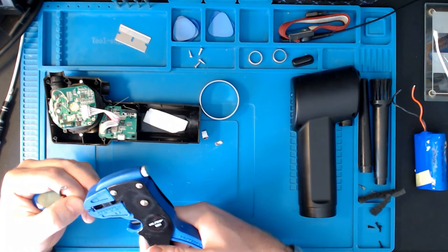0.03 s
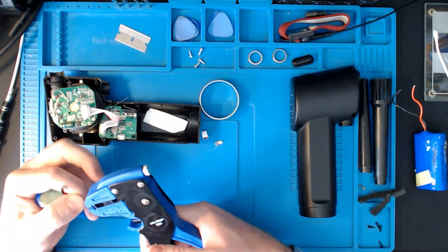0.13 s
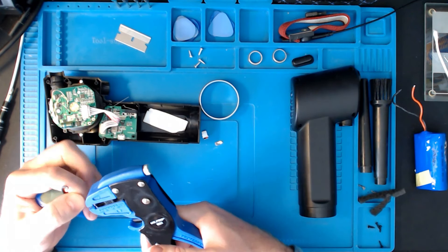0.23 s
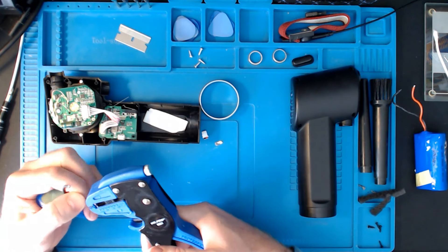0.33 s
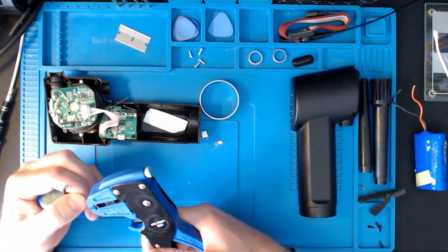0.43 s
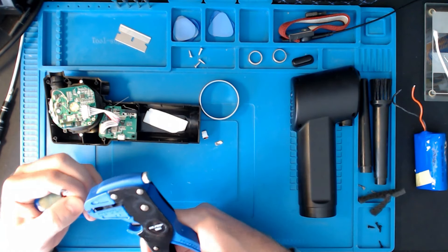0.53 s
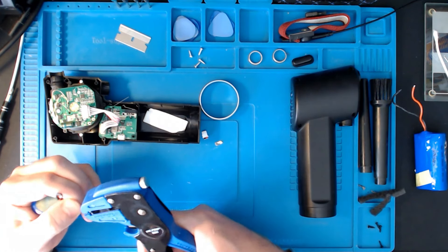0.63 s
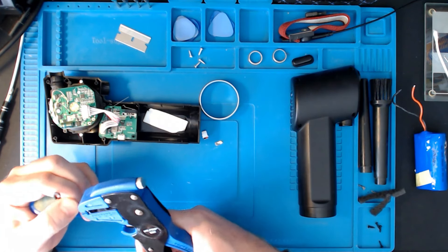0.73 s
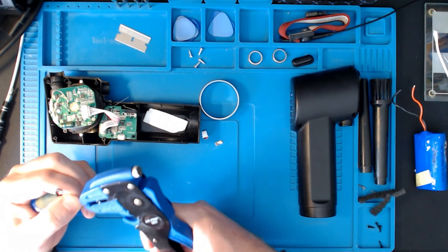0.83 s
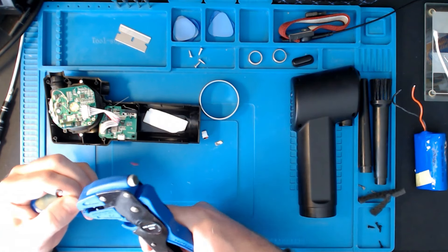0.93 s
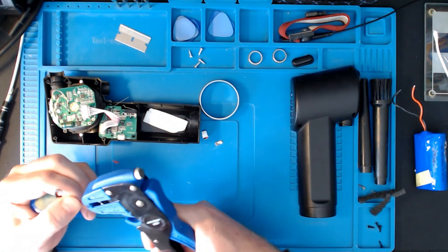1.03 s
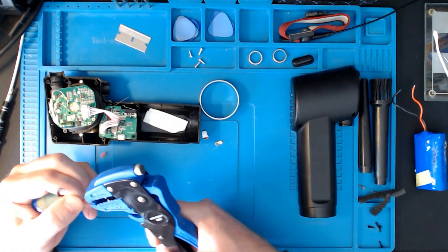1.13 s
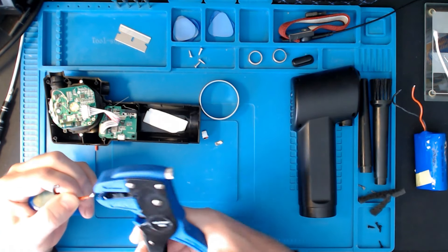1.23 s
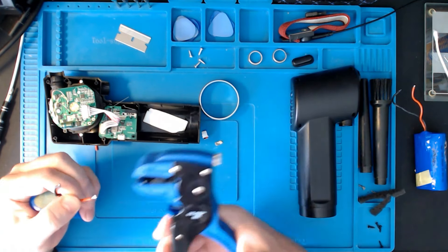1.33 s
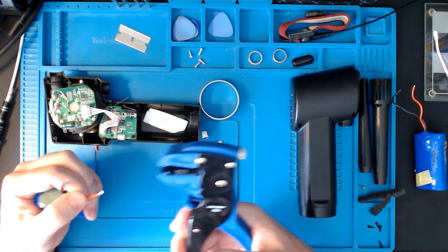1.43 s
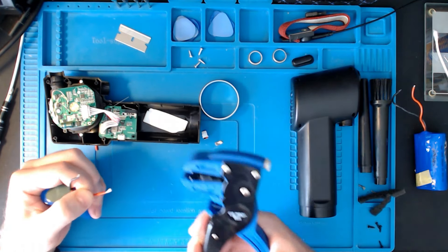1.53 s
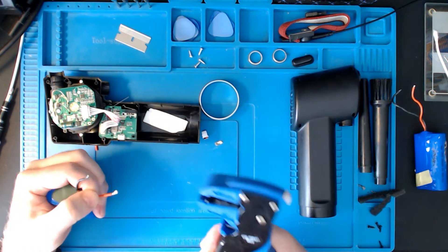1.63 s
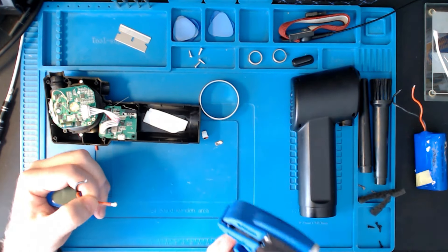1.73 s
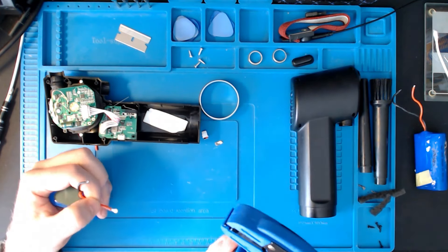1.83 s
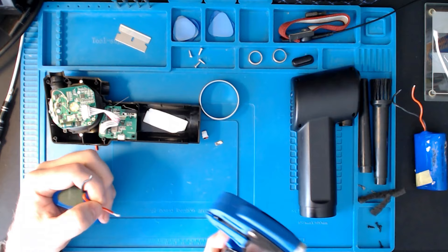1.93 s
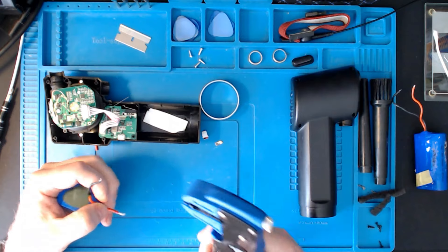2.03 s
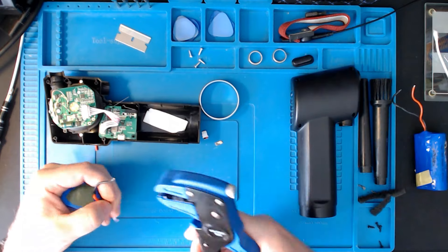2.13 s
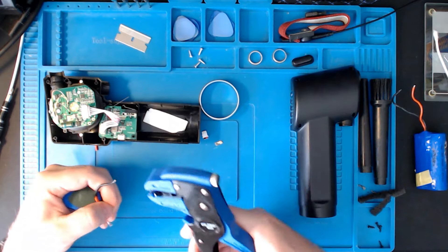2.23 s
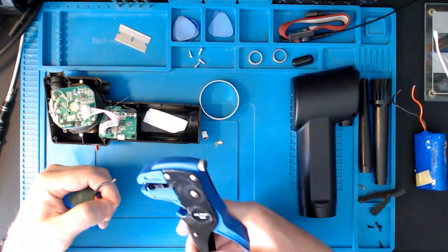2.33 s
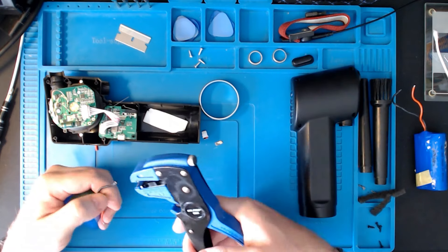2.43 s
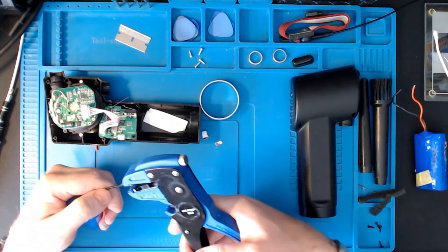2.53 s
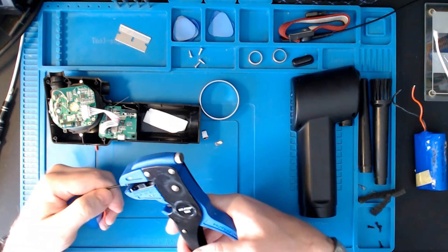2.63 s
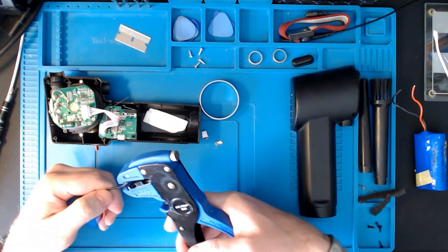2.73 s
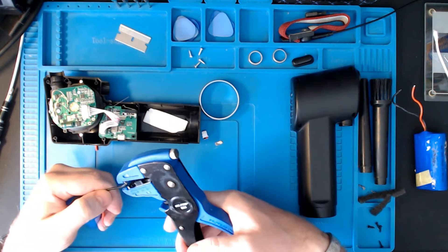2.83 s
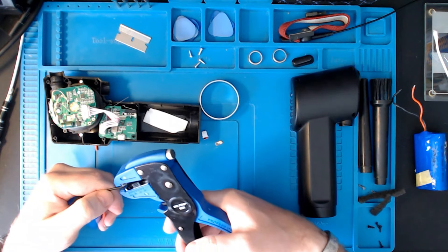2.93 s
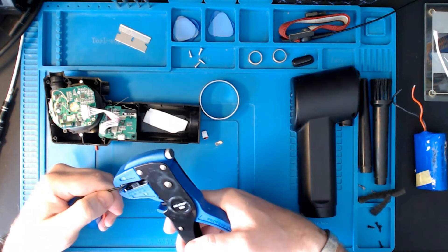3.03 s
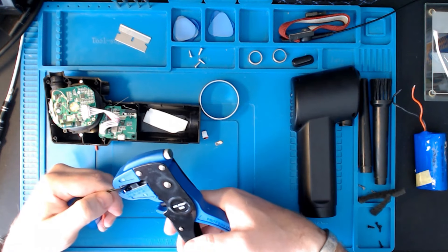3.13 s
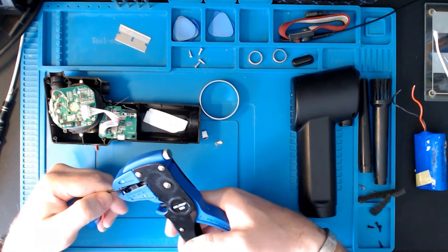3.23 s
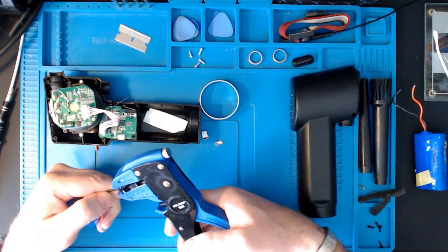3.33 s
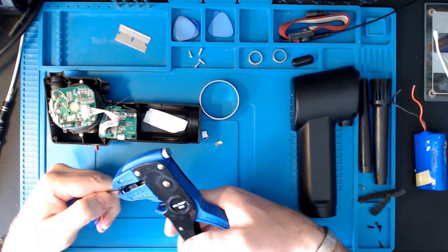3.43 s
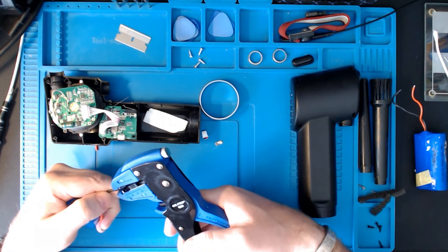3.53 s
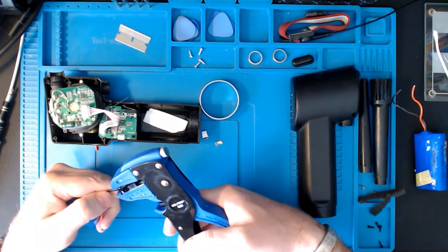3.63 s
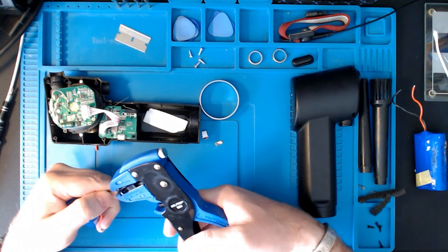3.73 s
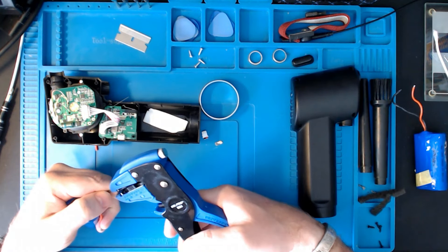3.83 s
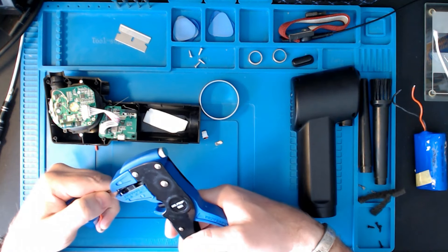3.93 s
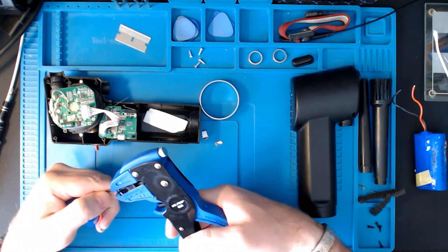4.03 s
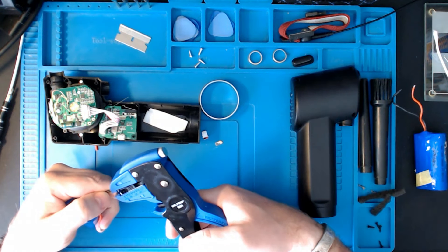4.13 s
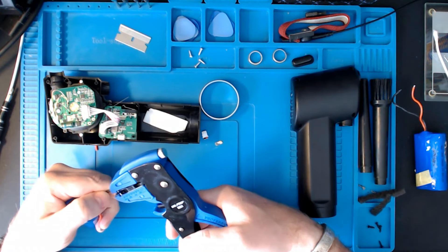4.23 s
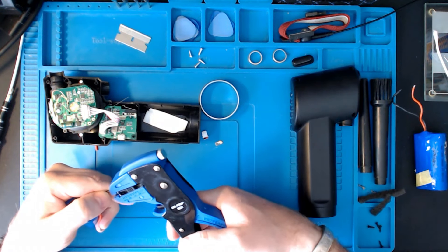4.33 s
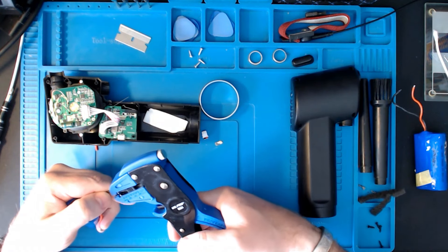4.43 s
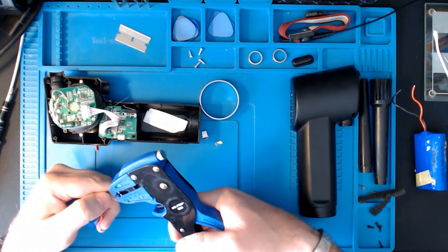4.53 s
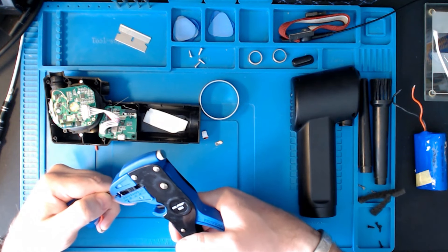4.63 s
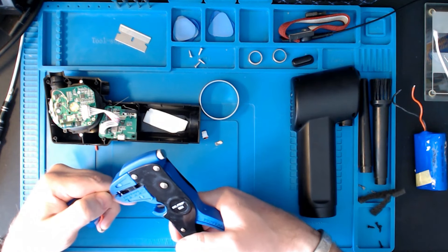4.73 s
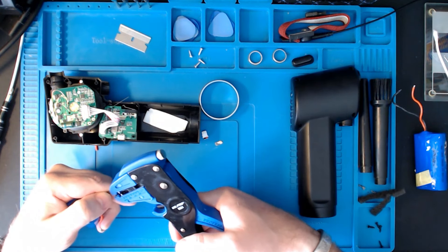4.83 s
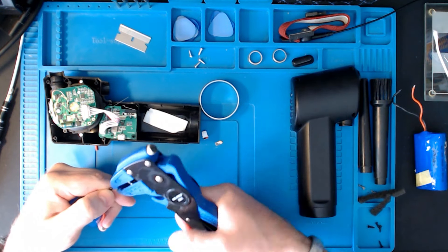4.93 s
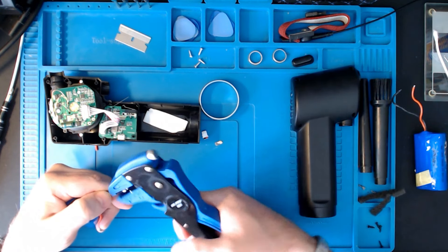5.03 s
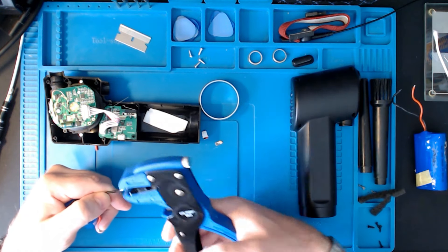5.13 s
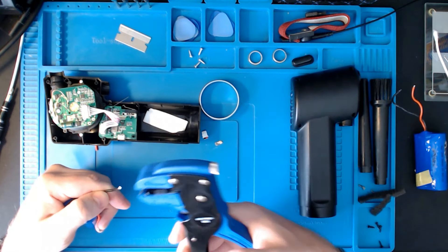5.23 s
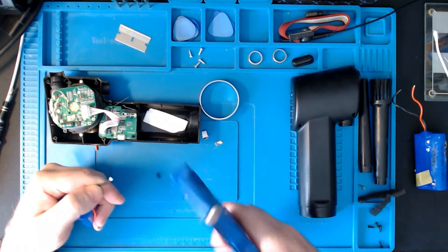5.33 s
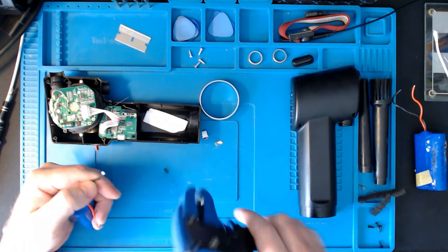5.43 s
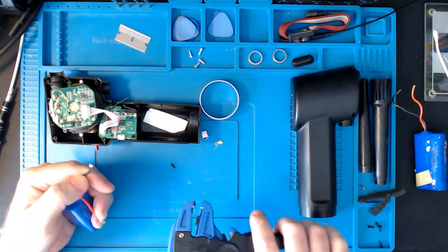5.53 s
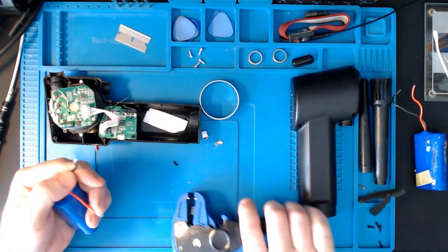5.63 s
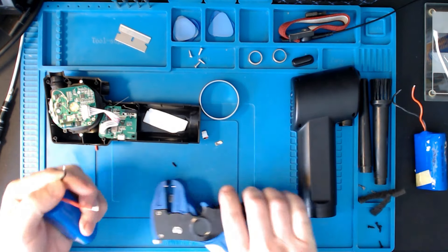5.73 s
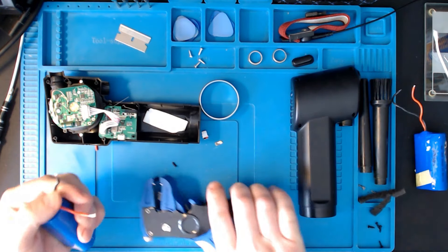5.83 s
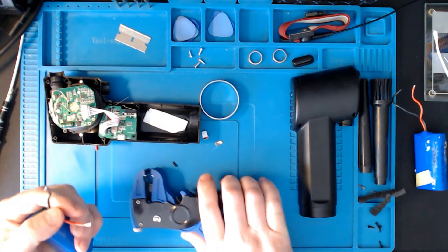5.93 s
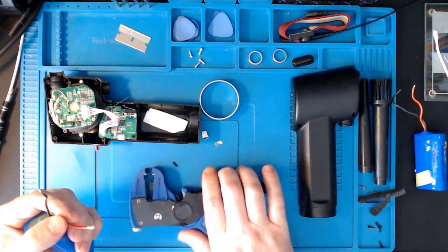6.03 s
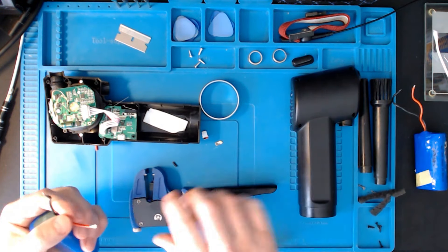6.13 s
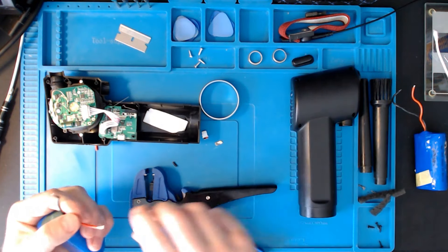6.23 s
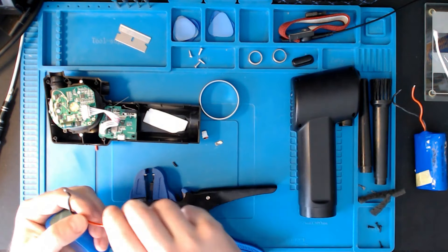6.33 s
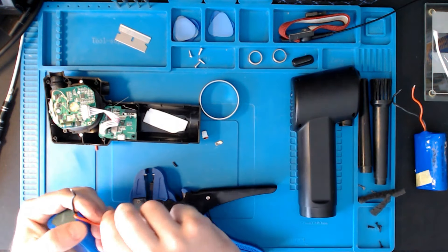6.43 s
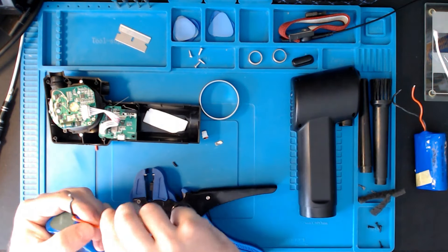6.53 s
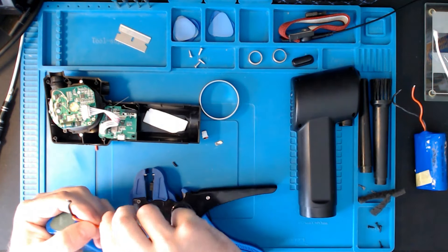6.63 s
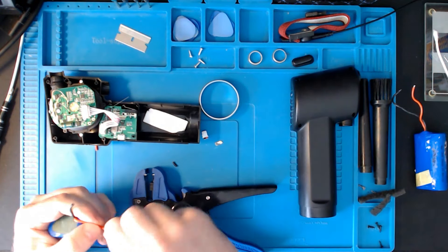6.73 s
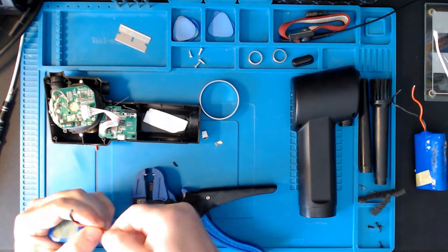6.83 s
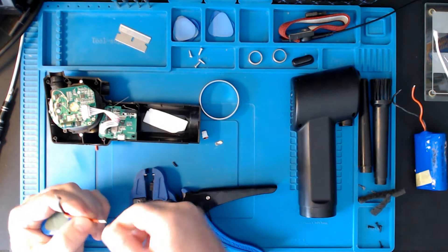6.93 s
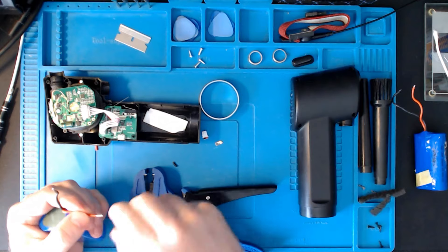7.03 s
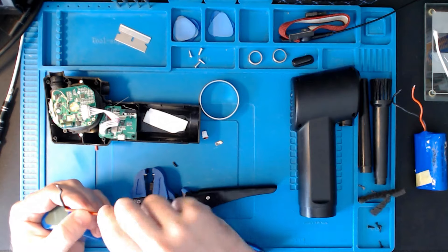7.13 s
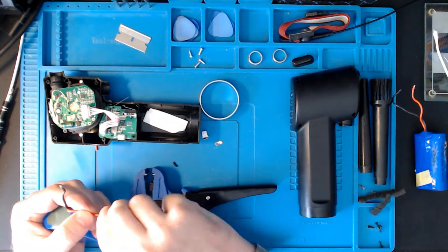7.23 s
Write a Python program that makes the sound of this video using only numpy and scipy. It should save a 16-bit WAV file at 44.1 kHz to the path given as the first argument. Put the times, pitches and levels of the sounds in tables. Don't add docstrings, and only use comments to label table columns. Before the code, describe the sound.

In a small furnished room with a steady fan and mains hum, a hand wire stripper scrapes, ticks and snaps hard. After quiet, faint loose rattles, it crunches and snaps again, louder, its spring singing briefly. Then it knocks on a rubber mat and drops flat with a loud slap and bench boom, before hum and a tiny flick of wire strands. The close microphone stand picks up low thumps.

```python
import sys
import numpy as np
from scipy import signal
from scipy.fft import rfft, irfft
from scipy.io import wavfile
from scipy.ndimage import uniform_filter1d

SR = 44100
rng = np.random.default_rng(int(sys.argv[2]) if len(sys.argv) > 2 else 0)


def convert_level_to_amplitude(level_db):
    exponent = np.asarray(level_db, float) / 20
    return 10 ** exponent


def materialize(psi):
    bounded = np.clip(np.atleast_2d(psi).T, -1, 1)
    quanta = np.round(bounded * 32767).astype(np.int16)
    wavfile.write(sys.argv[1], SR, quanta)


N = 321074


def add(out, start_s, sound):
    i = int(start_s * SR)
    out[i:i + len(sound)] += sound[:N - i]


def walk(rate_hz):
    hold = int(SR / rate_hz)
    steps = np.repeat(rng.standard_normal(N // hold + 1), hold)
    return 0.94 * uniform_filter1d(uniform_filter1d(steps, hold), hold)[:N]


def band(x, lo_hz, hi_hz):
    sos = signal.butter(2, [lo_hz, min(hi_hz, .45 * SR)], "band", fs=SR, output="sos")
    return signal.sosfilt(sos, x)


def ring(modes, length_s=.03):
    t = np.arange(int(length_s * SR)) / SR
    out = np.zeros(len(t))
    for k, (hz, db, t60) in enumerate(modes):
        out += (-1) ** k * convert_level_to_amplitude(db) * np.sin(2 * np.pi * hz * t) * 1000 ** (-t / t60)
    return out


# (f/Hz, level/dB, waver/dB)
HUM_TONES = [(100.5, -51, 1.5), (119.5, -48, 2), (180.7, -40.5, .5), (197, -66, 0.5), (273.4, -61, -3.5),
             (302, -64, 1.3), (399, -64.5, -1), (430, -64, 4.5), (499, -85, 0.5)]


def hum(drift=0.0028):
    out = np.zeros(N)
    for hz, db, waver_db in HUM_TONES:
        turns = np.cumsum(hz * (1 + drift * walk(3.3))) / SR + rng.random()
        out += convert_level_to_amplitude(db + waver_db * walk(6)) * np.sin(2 * np.pi * turns)
    return out


# (f/Hz, level/dB per Hz)
AIR_COLOUR = [(30, -83.5), (110, -77), (250, -81.5), (380, -84.5), (570, -80), (700, -80.5), (770, -89.5),
              (1000, -92.5), (2000, -99), (4000, -105.5), (8500, -107), (13000, -109), (15600, -110),
              (15900, -135)]


def air(flutter_db=0.5):
    at_hz, db = np.transpose(AIR_COLOUR)
    f = np.maximum(np.fft.rfftfreq(N, 1 / SR), 1)
    colour = convert_level_to_amplitude(np.interp(np.log(f), np.log(at_hz), db)) * np.sqrt(SR / 2)
    return irfft(rfft(rng.standard_normal(N)) * colour, N) * convert_level_to_amplitude(flutter_db * walk(4.1))


# (lowest f/Hz, highest f/Hz)
SWAY_BANDS = [(14, 22), (34, 74)]
# (t/s of most weight, level/dB, rise/s, fall/s per 20 dB)
LEANS_ON_BENCH = [
    (.4, -54, .4, 0.2),
    (.95, -48, .5, .3),
    (1.43, -50, .3, 0.15),
    (4.85, -41, .12, 0.2),
    (5.01, -34, .15, 0.17),
    (5.62, -44, .4, 0.46),
    (5.82, -43, .1, 0.3),
    (6.04, -37.5, .08, .33),
]
# (t/s, level/dB)
FRAME_JOLTS = [
    (4.78, -30),
    (5.49, -34),
    (5.78, -41.5),
    (5.9, -22),
]


def sway():
    t, out = np.arange(N) / SR, np.zeros(N)
    jolts = [(s, db, .04, .17) for s, db in FRAME_JOLTS]
    for edges, rest_db, pushes in zip(SWAY_BANDS, (-62, -64), (LEANS_ON_BENCH, jolts)):
        level = convert_level_to_amplitude(rest_db + 4 * walk(5))
        for s, db, rise_s, fall_s in pushes:
            level = level + convert_level_to_amplitude(db - 20 * np.maximum((s - t) / rise_s, (t - s) / fall_s))
        rocking = band(band(rng.standard_normal(N), *edges), *edges)
        even = rocking / uniform_filter1d(np.abs(rocking), SR // 5)
        out += even * level * convert_level_to_amplitude(-3.5)
    return out


# (f/Hz, level/dB, t60/s)
JAW_RINGS = [(2340, -0.16, 0.0077), (2770, -0.4, 0.0083), (3480, 2, 0.0038), (4300, -2, .004)]
HANDLE_RINGS = [(520, -5.5, 0.01), (850, -4, 0.0084), (1315, 4, .005), (1600, -7, .005)]
STEEL_RINGS = [(5000, 1.5, 0.004), (6000, -1.7, .005), (7000, 0.54, .004), (8570, -1, .004)]
EDGE_RINGS = [(9397, -8, 0.0048), (11466, 2, .004), (13700, -2, 0.0012), (14680, 0, .0015)]
# (t/s, length/s, start level/dB, end level/dB, steel level/dB re jaws)
SCRAPES = [(0.001, .055, -51.5, -79, 0), (0.61, .032, -60, -47, -7), (0.646, .013, -33.5, -32, -5.5),
           (0.66, .016, -33, -65, -1), (0.785, .094, -70, -62, -17), (0.888, .009, -47, -40.5, 0.5),
           (0.897, .033, -40.5, -62, 0), (0.975, .024, -64.5, -41, -3), (0.999, .043, -42, -39, 0),
           (1.045, .0085, -32.5, -31.5, -9), (4.735, .02, -55.5, -36, -5), (4.755, .01, -22.5, -17, -1.5),
           (4.766, .008, -14, -31, 1), (4.885, .056, -45, -39, 0), (4.944, .0085, -33.5, -32.5, -5),
           (5.489, .04, -44.5, -67, -3)]


def slides(grain_db=2.5):
    out = np.zeros(N)
    for s, length_s, start_db, end_db, steel_db in SCRAPES:
        n = int(length_s * SR)
        force = convert_level_to_amplitude(np.linspace(start_db, end_db, n) - 2.5) * signal.windows.tukey(n, .06)
        edge_db = -10 + 0.67 * steel_db
        parts = (JAW_RINGS, 0), (STEEL_RINGS, steel_db), (EDGE_RINGS, edge_db), (HANDLE_RINGS, -10)
        for rings, db in parts:
            size = convert_level_to_amplitude(grain_db * np.repeat(rng.exponential(size=1500), 12))
            grains = size * rng.standard_normal(len(size))
            sound = signal.fftconvolve(grains, ring(rings))[:n]
            add(out, s, sound / sound.std() * convert_level_to_amplitude(db) * force)
    return out


# (f/Hz, t60/s, level/dB re the direct sound)
ROOM_ECHO = [(600, 0.13, -11), (1194, 0.25, -10.5), (2500, 0.18, -10), (5000, 0.21, -10.5),
             (9000, .16, -7.5), (14000, 0.15, -9)]


def room(x, wall_ms=16, wall_db=-19, build_ms=3.4):
    t = np.arange(SR // 3) / SR
    out = convert_level_to_amplitude(wall_db) * np.roll(x, int(wall_ms * SR / 1000))
    at_hz, t60s, dbs = np.transpose(ROOM_ECHO)
    for hz in 400 * 2 ** (np.arange(33) / 6):
        edges = hz * 2 ** (-1 / 12), hz * 2 ** (1 / 12)
        fade = 1000 ** (-2 * t / np.interp(hz, at_hz, t60s))
        linger = (1 - np.exp(-1000 * t / build_ms)) * fade
        energy = signal.fftconvolve(band(x, *edges) ** 2, linger / linger.sum())[:N]
        noise = band(rng.standard_normal(N), *edges)
        out = out + convert_level_to_amplitude(np.interp(hz, at_hz, dbs)) * np.sqrt(np.abs(energy)) * noise / noise.std()
    return out


def contact(jaws, levels_db, rattle_ms, chatter=.2, slower=2.7):
    t = np.arange(SR // 30) / SR * 1000 / rattle_ms
    rattle = np.exp(-t) + chatter * np.exp(-t / slower)
    out = 0
    for part, db in zip((jaws, ring(HANDLE_RINGS), ring(STEEL_RINGS), ring(EDGE_RINGS)), levels_db):
        sound = signal.fftconvolve(rng.standard_normal(len(t)) * rattle, part)
        out = out + convert_level_to_amplitude(db) * sound / np.abs(sound).max()
    return out


# (t/s, level/dB, handle level/dB re the tick, steel level/dB re the tick, f/Hz of the loose part)
LOOSE_TICKS = [(0.029, -50, -5, 5, 4790), (1.6895, -47, -11.5, -4, 3200), (1.8094, -51, -4, -4, 2030),
               (2.2727, -44, -13, -12, 2700), (2.2944, -49, -6, -14, 2040), (2.5421, -41, -7, -18, 2290),
               (2.5543, -40.5, -9, -27, 2320), (2.782, -49, 0, 0, 3500), (5.141, -49, 14, -10, 1940),
               (5.176, -45, 0, -3.5, 3010), (5.1978, -49.5, 3, -13, 2270), (5.24, -49, 2, -11, 2930),
               (5.2544, -54, -1, -1, 2870), (5.415, -55, -6, -11, 4700), (5.4872, -33, -8, -10, 2900),
               (5.666, -50.5, -8, 10.5, 3400), (5.7376, -48, 14.5, -4, 1700), (5.835, -60, 21.5, -3, 1920),
               (6.2966, -53, -11.5, -5, 5100), (7.1073, -53, -4.5, -15.5, 2020)]
LINKAGE_TICKS = [(0.787, -46, -6, -20, 2430), (0.815, -39, 3, -22, 1900), (0.8184, -39, -1, -26, 2300),
                 (0.8562, -42, -5, -20, 2070), (0.8704, -46, -4, -12, 2120), (0.8817, -43, -9, -12, 3870),
                 (0.957, -33, 0.5, -9, 2300), (1.0001, -25.5, -3.5, -5, 3750),
                 (1.0034, -29, -5.5, -9.5, 4550), (4.301, -29, -28, -2, 2550), (4.4604, -57.5, 1, 14, 1950),
                 (4.8828, -32, -12, -2, 3050), (4.8948, -27.5, -1, -6, 1900), (5.0133, -37.5, 8, -2, 4910)]


def ticks():
    out = np.zeros(N)
    for rows in (LOOSE_TICKS, LINKAGE_TICKS):
        for s, db, handle_db, steel_db, hz in rows:
            edge_db = -14 + .55 * steel_db
            piece = band(ring([(hz, 0, .004), (1.33 * hz, -4, .004)]), .75 * hz, 1.8 * hz)
            add(out, s, contact(piece, db + np.array([0, handle_db, steel_db, edge_db]), rattle_ms=0.92))
    return out


# (t/s, jaws level/dB, steel level/dB re jaws, edge level/dB re jaws, f/Hz favoured by the spot struck)
HARD_SNAPS = [(0.6445, -32.5, 4, 7, 4400), (0.6458, -27, 7, -2, 4300), (.6605, -26, -7, -8, 4550),
              (1.0432, -17, -16.5, -16, 2600), (1.0538, -12.5, 1, 0.5, 2700), (1.0554, -9.5, 1.5, 7, 3700),
              (4.760, -11, -5, -11.5, 3000), (4.7634, -5, -5, -10, 4500), (4.7648, -6.5, -6, -11, 3500),
              (4.942, -21, -0.5, -9, 2570), (4.9515, -15, -0.5, -9, 2800), (4.9531, -11, -5, -3.5, 3298)]
LONG_CRUNCHES = [
    (.6515, -24, -14, -14, 2400),
    (1.0568, -10.5, 0.5, -2, 5000),
    (4.7546, -21, 0, -3, 2850),
    (4.7565, -16, 2, -8, 2850),
    (4.7665, -15, -3, -4, 2800),
    (4.9544, -8.5, 6.5, 6.5, 4900),
]


def snaps():
    out = np.zeros(N)
    for rows, rattle_ms in ((HARD_SNAPS, .8), (LONG_CRUNCHES, 1.7)):
        for s, db, steel_db, edge_db, hz in rows:
            struck = band(ring(JAW_RINGS) + ring([(hz, 8, .006)]), 2000, 9000)
            add(out, s, contact(struck, db + np.array([0, -18, steel_db, edge_db]), rattle_ms))
    return out


# (f/Hz, level/dB, t60/s)
SPRING_TONES = [(2550, -4, 0.15), (3100, -5, 0.12), (3700, 0, 0.1), (5050, -4, 0.14), (7250, -2, 0.16),
                (8250, -4, 0.11), (10650, -2, .12)]
# (t/s, level/dB, tilt/dB per octave)
SPRING_TWANGS = [
    (.646, -54, -4),
    (1.057, -34, 0),
    (4.765, -28, -8),
    (4.955, -35, 1),
    (5.879, -43, -3),
]


def spring(jostle_hz=95):
    out, t = np.zeros(N), np.arange(SR // 4) / SR
    for s, db, tilt_db in SPRING_TWANGS:
        for hz, tone_db, t60 in SPRING_TONES:
            x = band(rng.standard_normal(len(t)), hz - jostle_hz, hz + jostle_hz)
            level = convert_level_to_amplitude(db + tone_db + tilt_db * np.log2(hz / 4000))
            add(out, s, level * x / x.std() * 1000 ** (-t / t60))
    return out


# (t/s, level/dB, contact/ms)
MAT_SLAPS = [
    (5.4803, -22.5, 1.32),
    (5.8758, -1.5, 1.1),
    (5.8772, -14, .8),
    (.8160, -30, 0.34),
    (.9572, -27.5, .4),
]


def slaps():
    out, t = np.zeros(N), np.arange(SR // 50) / SR
    for s, db, contact_ms in MAT_SLAPS:
        u = 1000 * t / contact_ms
        push = np.sin(np.pi * np.minimum(u, 1)) ** 2
        pull = 0.4 * (u > 1) * np.exp(-(u - 1) / 1.7)
        add(out, s, convert_level_to_amplitude(db) * (push - pull))
    return out


def boom(hz, t60, sign, db, push_ms):
    t = np.arange(SR // 2) / SR
    swell = 1 - np.exp(-10 * t * hz / push_ms)
    return convert_level_to_amplitude(db) * sign * swell * np.sin(2 * np.pi * hz * t) * 1000 ** (-t / t60)


# (f/Hz, t60/s, sign at the stand, travel/ms, column of the knocks table, level/dB)
BENCH_RINGS = [(43, 0.16, -1, 1.7, 1, -9), (83.1, .24, 1, 4, 1, -0.5), (112, .12, -1, 4, 1, 2),
               (150.3, 0.2, 1, 2.3, 2, -5), (203.8, 0.19, -1, 2.5, 3, -3.5), (283, .1, 1, 1.1, 4, -4.5),
               (336, .07, -1, 1.5, 4, -6.5), (460, 0.099, 1, 1.3, 4, -8.5),
               (541.5, 0.072, -1, 0.46, 4, 1.5), (720, 0.042, 1, .4, 4, -2)]
# (t/s, lowest rings level/dB, 152 Hz level/dB, 200 Hz level/dB, upper rings level/dB)
BENCH_KNOCKS = [
    (4.76, -17, -22, -36, -27),
    (5.480, -5.5, -12.5, -18, -30),
    (5.739, -13.5, -29, -47, -43),
    (5.838, -24, -25, -46, -49),
    (6.149, -41, -43, -42, -63),
]


def knocks():
    out = np.zeros(N)
    for knock in BENCH_KNOCKS:
        for hz, t60, sign, travel_ms, column, db in BENCH_RINGS:
            level_db = knock[round(column)] + db
            add(out, knock[0] + travel_ms / 1000, boom(hz, t60, sign, level_db, push_ms=1.3))
    return out


# (t/s, jaws level/dB, handle level/dB re jaws, steel level/dB re jaws, edge level/dB re jaws)
MAT_LANDINGS = [
    (5.4750, -55, -5, 3, 2),
    (5.48, -37.5, 10, -6, -12),
    (5.4875, -40, -3, 0, -5),
    (5.8745, -17, 5, -11, -12),
    (5.8790, -29, 3, 1, -16.5),
]


def landings():
    out = np.zeros(N)
    for s, db, *rel_db in MAT_LANDINGS:
        jaws = ring(JAW_RINGS) + ring([(3150, 8, .006)])
        add(out, s, contact(jaws, db + np.array([0, *rel_db]), rattle_ms=1.4))
    return out


# (f/Hz, t60/s, sign at the stand, travel/ms, level/dB)
DROP_RINGS = [(42.84, 0.31, -1, .3, -16.5), (83.2, .27, 1, 2, -5), (114.7, .18, -1, 1.6, -5.5),
              (149, .14, -1, 3.0, -4.5), (196.6, 0.1094, 1, 2.7, -16), (195.4, 0.18, 1, 23.1, -7.5),
              (285, .13, 1, 0.57, -15), (350, 0.115, 1, 0.59, -15.5), (441, 0.14, -1, 1.1, -24.5),
              (545, 0.105, -1, 0.55, -23.5), (726, 0.059, 1, 0.45, -28.5), (855, 0.081, -1, .4, -27.5)]


def drop(at_s=5.875):
    out = np.zeros(N)
    for hz, t60, sign, travel_ms, db in DROP_RINGS:
        add(out, at_s + travel_ms / 1000, boom(hz, t60, sign, db, push_ms=1.5))
    return out


# (t/s, level/dB of the thin top ring)
STRAND_PINCHES = [
    (6.4744, -52.5),
    (6.494, -37.5),
]
# level/dB of jaws, handle, steel, edge
STRAND_LEVELS = (-17, -18, -11, 1)


def strands():
    out = np.zeros(N)
    for s, db in STRAND_PINCHES:
        add(out, s, contact(ring(JAW_RINGS), db + np.array(STRAND_LEVELS), rattle_ms=0.92))
    return out


def scene():
    tool = slides() + ticks() + snaps() + slaps() + landings() + strands()
    bench = knocks() + drop()
    background = hum() + air() + sway()
    return (tool + room(tool) + spring() + bench + background)[None]


def top_cut(x):
    return signal.sosfilt(signal.butter(12, 16520, fs=SR, output="sos"), x)


def record(dry):
    low_pass = signal.ellip(8, .2, 40, 15800, fs=SR, output="sos")
    mix = np.clip(signal.sosfilt(low_pass, dry), -1, 1)
    return top_cut(mix)


dry = scene()
out = record(dry)
materialize(out)
```